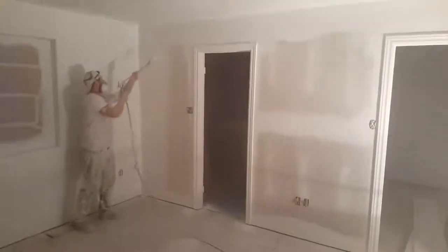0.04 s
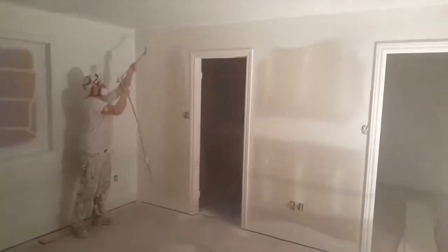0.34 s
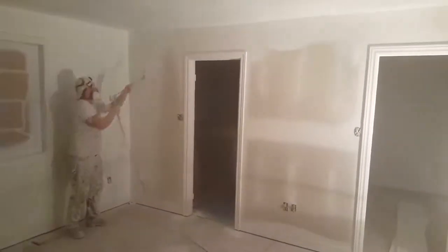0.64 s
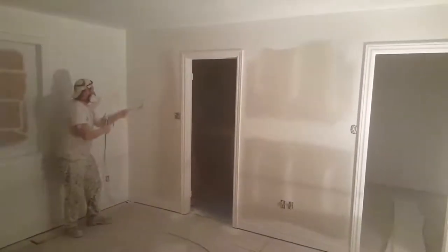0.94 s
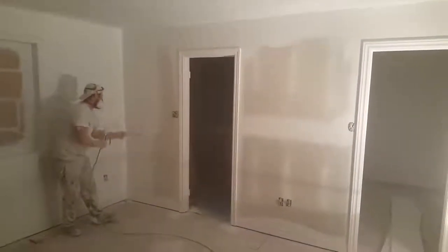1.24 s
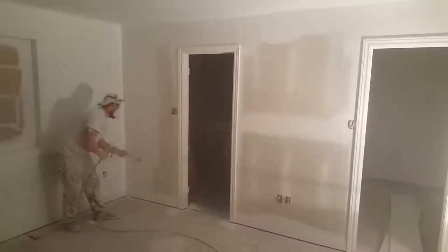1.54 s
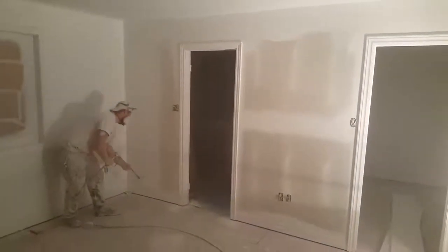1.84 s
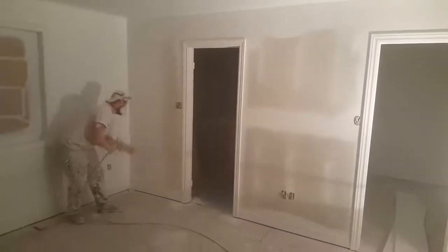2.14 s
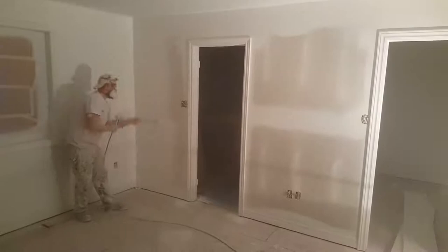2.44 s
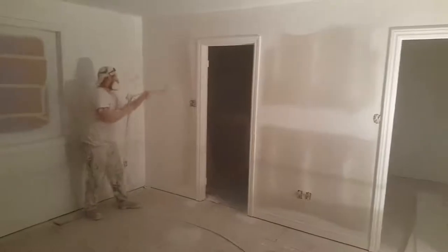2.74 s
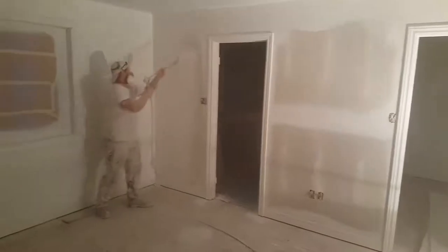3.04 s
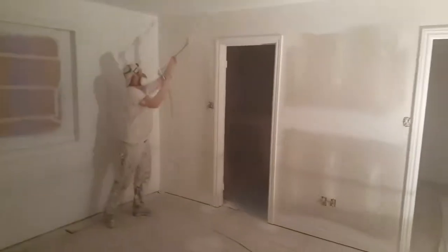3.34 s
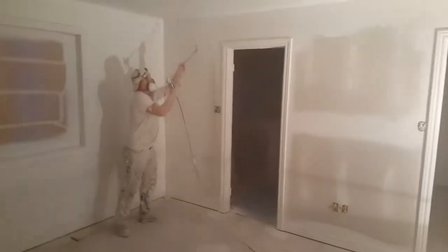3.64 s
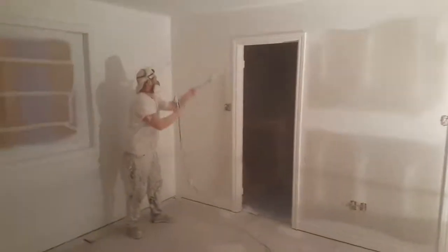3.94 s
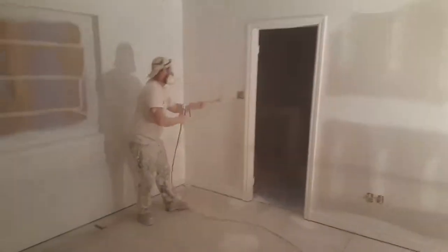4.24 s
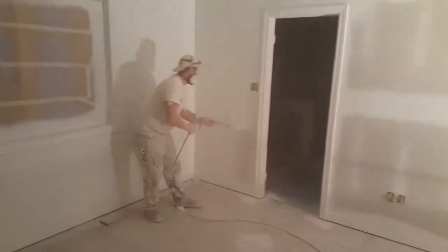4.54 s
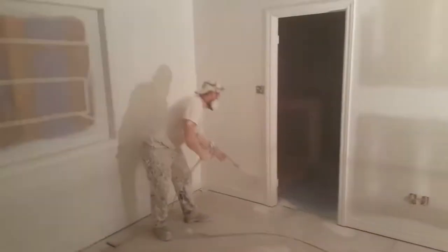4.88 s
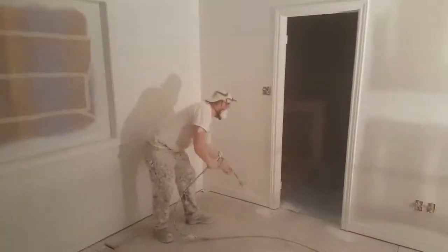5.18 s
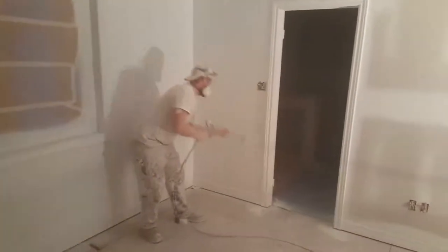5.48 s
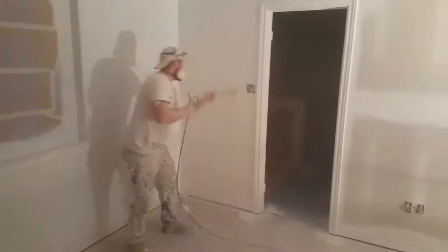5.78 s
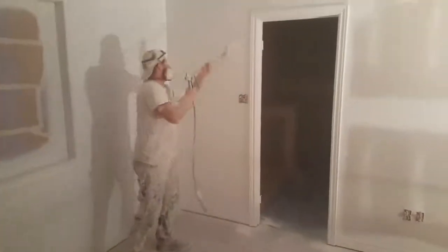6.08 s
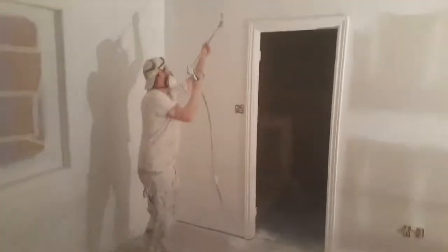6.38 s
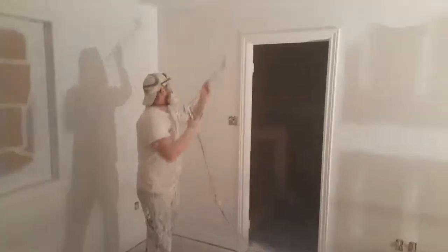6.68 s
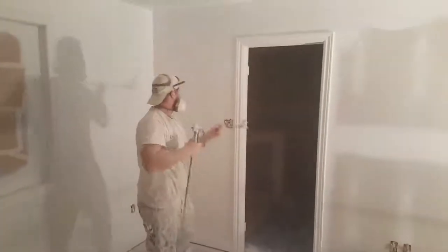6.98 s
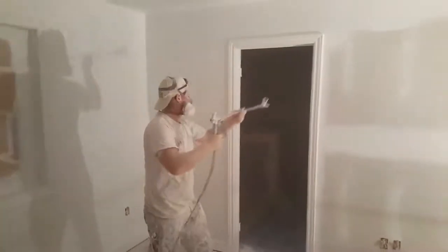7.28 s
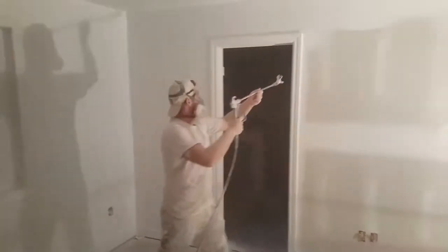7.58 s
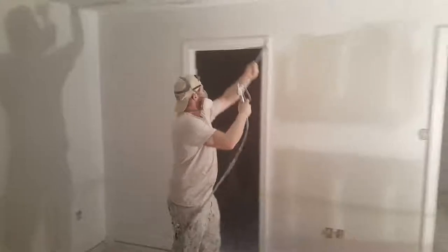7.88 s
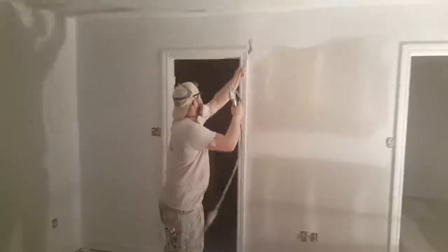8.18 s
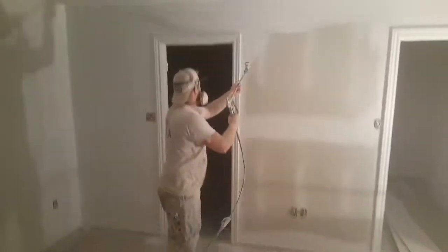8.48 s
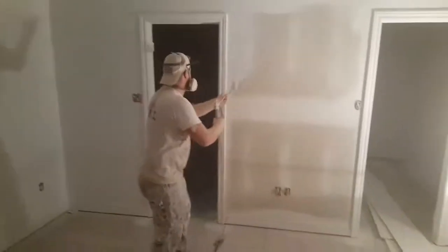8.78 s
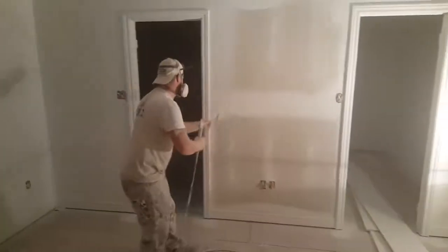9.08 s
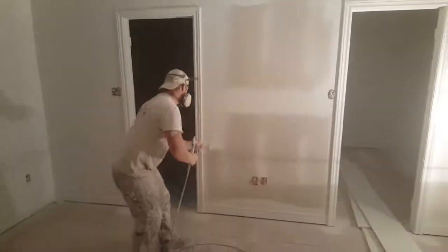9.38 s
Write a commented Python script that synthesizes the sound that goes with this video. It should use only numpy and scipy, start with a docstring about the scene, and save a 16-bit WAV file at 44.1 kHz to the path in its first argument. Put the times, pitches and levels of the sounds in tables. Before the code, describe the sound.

A paint sprayer hisses over a whirring pump in an echoing room, pauses for shuffling steps, then starts again.

```python
"""An airless paint sprayer hisses in a bare, echoing room as paint tears into droplets at its tip.
Farther off, the pump's motor hums, its housing rattles and its gears whirr with each piston stroke.
The trigger is let go for under two seconds; the pump swells briefly, stops,
and restarts after the spray resumes. Shoes shuffle, scrape and knock on the dusty, hollow floor nearby.
In the pause the gun ticks once and a hand bumps the microphone."""
import sys
import numpy as np
from scipy import signal
from scipy.fft import rfft, irfft, next_fast_len
from scipy.io import wavfile
from scipy.ndimage import map_coordinates

SR = 44100
rng = np.random.default_rng(int(sys.argv[2]) if len(sys.argv) > 2 else 0)


def generate_wav(sig):
    """Save sig (samples, or channels by samples) to the path in sys.argv[1] as 16-bit PCM at SR."""
    pcm = np.round(np.clip(np.atleast_2d(sig).T, -1, 1) * 32767).astype(np.int16)
    wavfile.write(sys.argv[1], SR, pcm)


N = 419832
TIME_S = np.arange(N) / SR


def amp(db):
    return 10 ** (np.asarray(db) / 20)


def unit_rms(x):
    return x / np.sqrt(np.mean(x ** 2) + 1e-20)


def at_hz(points, hz):
    """Interpolate (Hz, value) rows on a log axis."""
    knots_hz, values = np.transpose(points)
    return np.interp(np.log(hz + 1), np.log(knots_hz + 1), values)


def curve(rows):
    """Interpolate (s, value) rows per sample."""
    return np.interp(TIME_S, *np.transpose(rows))


def gate(spans, rise_s, fall_s):
    """1 within the (on, off) spans, with linear ramps."""
    return sum(np.clip((TIME_S - on) / rise_s, 0, 1) * np.clip((off - TIME_S) / fall_s + 1, 0, 1)
               for on, off in spans)


def bell(centre_s, sigma_s):
    return np.exp(-.5 * ((TIME_S - centre_s) / sigma_s) ** 2)


def swells(rows):
    return sum(amp(db) * bell(centre_s, sigma_s) for centre_s, db, sigma_s in rows)


def wobble(rate_hz):
    """Smooth random curve with rate_hz knots a second."""
    return map_coordinates(rng.standard_normal(int(N * rate_hz / SR) + 4), [TIME_S * rate_hz])


def filtered(x, response):
    size = next_fast_len(N + SR // 2)
    return irfft(rfft(x, size) * response(np.fft.rfftfreq(size, 1 / SR)), size)[..., :N]


def noise(spectrum):
    """Independent mid and side noise, rms 1."""
    return unit_rms(filtered(rng.standard_normal((2, N)), lambda hz: amp(at_hz(spectrum, hz))))


def ahead(x):
    """A source straight ahead: all mid, no side."""
    return np.array([x, np.zeros(N)])


def body_response(spectrum, size=4096):
    """Minimum-phase impulse response, peak 1."""
    cepstrum = irfft(np.log(amp(at_hz(spectrum, np.fft.rfftfreq(size, 1 / SR)))))
    cepstrum[1:size // 2] *= 2
    cepstrum[size // 2 + 1:] = 0
    response = irfft(np.exp(rfft(cepstrum)))
    return response / np.abs(response).max()


def strikes(rows, spectrum, t60_s=0, contact_s=.0026):
    """Blows (s, dB) on a body: dense ringing modes, or a dead impact if t60_s is 0."""
    blows = np.zeros(N)
    t = np.arange(SR // 4) / SR
    for start_s, db in rows:
        blow = t == 0
        if t60_s:
            blow = rng.standard_normal(len(t)) * (1 - np.exp(-t / contact_s)) * amp(-60 * t / t60_s)
        blows[round(start_s * SR):][:len(t)] += amp(db) * blow / np.linalg.norm(blow)
    return signal.fftconvolve(blows, body_response(spectrum))[:N]


def early_reflections(x, count=10):
    """Wall echoes carve fixed ripples into a still source's spectrum; rms 1."""
    lags_s = rng.uniform(.004005, .05, count)
    echoes = sum(rng.choice([-1, 1]) * np.roll(x, round(lag * SR), axis=1) for lag in lags_s)
    return unit_rms(x + .2 * echoes)


# Trigger held. Each row: open in seconds, shut in seconds.
TRIGGER_SPANS_S = [(-1, 6.452), (8.202, 11)]
SHUT_S, REOPEN_S = TRIGGER_SPANS_S[0][1], TRIGGER_SPANS_S[1][0]
# Jet and finer mist. Each row: frequency in Hz, density in dB.
JET_SPECTRUM = [(40, -44), (150, -24), (1000, -18), (2000, -16), (2700, -13.2), (3300, -12.3), (4200, -8),
                (5200, -5.5), (6400, -0.15), (7100, -2.5), (7900, 1.1), (8700, -3), (9600, -13),
                (12000, -30)]
MIST_SPECTRUM = [(6000, -33), (8500, -2), (9600, 0.5), (11000, 0.5), (12500, 0), (14000, -2.5),
                 (16000, -5.5)]
# Mist, weaker as the painter turns away. Each row: time in seconds, level in dB.
MIST_LEVEL_DB = [(0, -22.5), (5.4, -23.5), (8.3, -21), (9, -26.8), (9.5, -25)]


def spray(jet_db=-18.35, jet_db_per_s=.03, spurt_s=.047):
    """Paint tears into hissing droplets. Stored pressure spurts on opening and bleeds off on closing."""
    spurt_db = 2 * np.exp(-np.abs(TIME_S - REOPEN_S) / spurt_s)
    flutter_db = .5 * wobble(14) + 1.06 * wobble(70) + .55 * wobble(900)
    jet = amp(jet_db + jet_db_per_s * TIME_S + .2 * wobble(3)) * noise(JET_SPECTRUM)
    mist = amp(curve(MIST_LEVEL_DB) + .33 * wobble(11)) * noise(MIST_SPECTRUM)
    valve = gate(TRIGGER_SPANS_S, rise_s=.0033, fall_s=.12)
    return valve * amp(flutter_db + spurt_db) * (jet + mist)


def back_pressure():
    """0 while paint flows, rising to 1 behind the shut valve."""
    return gate([(SHUT_S, REOPEN_S)], rise_s=.21, fall_s=.05)


def pump_gain(db_per_s=-.03, pause_swell_db=4):
    """The pump slowly fades, and swells while the hiss pauses."""
    return amp(db_per_s * TIME_S + pause_swell_db * back_pressure())


# Motor running. Each row: on in seconds, off in seconds.
MOTOR_SPANS_S = [(-1, 6.94), (9, 11)]
# Loose housing and booming frame. Each row: frequency in Hz, density in dB.
HOUSING_SPECTRUM = [(50, -27), (150, -14), (250, -11.5), (340, -9), (520, -11.5), (600, -7.5), (820, -5.5),
                    (980, -9), (1200, -7.5), (1660, -4.7), (2100, -11), (3050, -13), (3450, -22),
                    (4600, -18.5), (4850, -14.5), (5250, -19), (6500, -23), (9000, -36), (12000, -47),
                    (16000, -52)]
FRAME_SPECTRUM = [(100, -25), (200, -3), (260, 0), (340, -1), (450, -12), (800, -40)]
# Hum, varying about the room. Each row: time in seconds, level in dB.
HUM_LEVEL_DB = [(0, -48.5), (.45, -47), (.68, -56), (1, -44.5), (1.7, -52), (2.2, -51), (2.45, -43),
                (2.75, -46.5), (3, -58), (3.45, -60), (3.9, -51), (4.38, -44.5), (5.1, -48), (5.9, -45.5),
                (6.15, -50), (6.4, -44.5), (9.5, -45)]


def pump_motor(motor_hz=83, hum_pause_db=7.5, boom_db_per_s=-1):
    """The motor shakes housing and frame. Returns rattle plus boom, and its own hum."""
    shaft_rad = 2 * np.pi * motor_hz * np.cumsum(1 + .0019 * wobble(5)) / SR  # load unsettles the speed
    rattle = amp(-30.5) * pump_gain() * early_reflections(noise(HOUSING_SPECTRUM))
    boom = amp(-39 + boom_db_per_s * TIME_S + 1.5 * wobble(6)) * noise(FRAME_SPECTRUM)
    hum_db = curve(HUM_LEVEL_DB) + hum_pause_db * back_pressure() + 1.9 * wobble(13)
    hum = amp(hum_db) * np.sin(shaft_rad + .6 * wobble(16))
    shaking = gate(MOTOR_SPANS_S, rise_s=.09, fall_s=.17) * (rattle + boom)
    return shaking, ahead(gate(MOTOR_SPANS_S, rise_s=.028, fall_s=.08) * hum)


# Gear whirr. Each row: frequency in Hz, density in dB.
WHIRR_SPECTRUM = [(150, -21.5), (250, -9.5), (340, -8), (520, -14), (600, -4), (660, -3.5), (740, 1.5),
                  (790, 2.5), (850, 1), (900, -5), (1000, -9.5), (1250, -12), (1500, -6), (1680, -5),
                  (1900, -10), (3000, -29), (6000, -60)]
# Gear tones. Each row: nominal pitch in Hz, level in dB, peak as a fraction of the stroke,
# swell sharpness, drift in dB/s as the listener roams, change in dB while the valve is shut.
GEAR_TONES = [(576.6, -48.5, 0.56, 0.31, -.5, 11), (614, -48, 0.41, 0.72, -.4, 11),
              (651.4, -34.3, 0.21, 0.38, -1.35, 0), (683, -42.5, .72, .8, .1, 2),
              (710, -36.8, 0.64, 2, -1.6, 1), (790, -39.5, 0.93, 1.1, -.45, 7),
              (842, -40, 0.16, 1.7, -1.3, 4), (1508, -44.5, .98, 3, -.9, -5),
              (1600, -49, 0.53, 0.56, -.7, 10), (1670, -41, 0.088, 1.4, -.8, -3)]


def gear_train(stroke_hz=7.684, sag_hz_per_s=.006, roam_rad_per_s=.22 * np.pi, size=8192):
    """The same teeth meet in every stroke: the whirr repeats and each tone swells at its own point."""
    pressure = back_pressure()
    strokes = np.cumsum(stroke_hz - sag_hz_per_s * TIME_S + .00601 * wobble(2)) / SR
    orders = np.arange(size // 2 + 1)
    phasors = np.exp(2j * np.pi * rng.random((4, len(orders))))
    cycles = irfft(amp(at_hz(WHIRR_SPECTRUM, orders * stroke_hz)) * phasors)
    looped = np.array([np.interp(strokes, np.arange(size) / size, cycle, period=1) for cycle in cycles])
    here, there = unit_rms(looped).reshape(2, 2, N)  # whirr at two listening spots
    roam_rad = roam_rad_per_s * TIME_S + .25 * wobble(1.5)
    whirr = amp(-31.6) * (np.cos(roam_rad) * here + np.sin(roam_rad) * there)
    for hz, db, peak_at, sharpness, db_per_s, pause_db in GEAR_TONES:
        swell = unit_rms(np.exp(sharpness * np.cos(2 * np.pi * (strokes - peak_at))))
        mesh_rad = 2 * np.pi * (round(hz / stroke_hz) * strokes + rng.random((2, 1)))
        tone = unit_rms(np.sin(mesh_rad + .25 * wobble(12) + .18 * wobble(60)))
        tone_db = db + db_per_s * TIME_S + pause_db * pressure + 1.3 * wobble(9)
        whirr += amp(tone_db) * swell * tone
    return gate(MOTOR_SPANS_S, rise_s=.17, fall_s=.28) * pump_gain() * whirr


# Room air. Each row: frequency in Hz, density in dB.
AIR_SPECTRUM = [(25, -19), (55, 0), (80, 9), (250, -5), (1000, -12), (4000, -22), (9000, -35), (16000, -50)]


def room_air():
    """Faint, steady low noise of the room."""
    return amp(-54.7) * noise(AIR_SPECTRUM)


def slide(start_s, hold_s, attack_s=.1, fade_db_per_s=58):
    """Envelope of a sole that gathers speed, holds it and slows to rest."""
    since_s = TIME_S - start_s
    slowing_s = np.maximum(since_s - attack_s - hold_s, 0)
    return .5 * (1 + np.tanh(2 * since_s / attack_s - 1)) * amp(-fade_db_per_s * slowing_s)


# Hollow floor, joists, rubber sole and dust. Each row: frequency in Hz, density in dB.
BOARD_SPECTRUM = [(40, -37), (110, -27), (165, -7.5), (260, -.5), (345, 1.5), (500, -8), (700, -7.5),
                  (1000, -18), (1400, -22), (2500, -35), (5000, -58)]
JOIST_SPECTRUM = [(50, -26), (100, -10), (145, 0), (180, -2), (300, -20), (1000, -60)]
SCRAPE_SPECTRUM = [(250, -20), (550, 2.5), (750, 6.5), (1100, -3), (1350, -1), (2000, -6), (2600, -7.3),
                   (3500, -17), (8000, -45)]
GRIT_SPECTRUM = [(1200, -15), (2600, 2), (3400, 1.5), (6000, -0.5), (8300, -2), (9400, -13), (12000, -16),
                 (16000, -18)]
# Weight on the boards, soft steps on the joists and a sole's squeak.
# Each row: centre in seconds, level in dB, sigma in seconds.
BOARD_TREADS = [(.2, -36.5, 0.07), (.57, -38, .05), (2.62, -35.5, 0.046), (4.42, -36.5, 0.046),
                (5.92, -35, 0.056), (6.84, -33.5, 0.055), (7.175, -26.5, .06), (7.41, -31, 0.13),
                (7.8, -42.5, 0.1), (8.09, -34.5, 0.041), (8.33, -33.5, 0.08), (9.0, -37, 0.037),
                (9.2, -32.5, 0.085)]
JOIST_STEPS = [(4.41, -41, .05), (5.92, -39.5, .03), (6.83, -39, .04), (8.15, -42, .04), (9.15, -38, .04)]
SOLE_SQUEAKS = [(7.922, -34, 0.012)]
# Sliding soles. Each row: start in seconds, hold in seconds, scrape in dB, grit in dB.
SOLE_SLIDES = [(7.128, 0.06, -24.3, -37.5), (7.849, 0.11, -36, -40)]


def shuffle(squeak_hz=890):
    """Soles catch and slip: boards judder, joists flex, rubber scrapes and squeaks, dust rasps."""
    judder = swells(BOARD_TREADS) * unit_rms(noise(BOARD_SPECTRUM) * amp(2 * wobble(70)))
    scrape = unit_rms(noise(SCRAPE_SPECTRUM) * amp(wobble(120)))
    grit = unit_rms(noise(GRIT_SPECTRUM) * amp(.9 * wobble(300)))
    sliding = sum(slide(start_s, hold_s) * (amp(scrape_db) * scrape + amp(grit_db) * grit)
                  for start_s, hold_s, scrape_db, grit_db in SOLE_SLIDES)
    flex = swells(JOIST_STEPS) * noise(JOIST_SPECTRUM)
    squeak = unit_rms(np.sin(2 * np.pi * squeak_hz * TIME_S + .4 * wobble(90)))
    return judder + flex + sliding + swells(SOLE_SQUEAKS) * ahead(squeak)


# Heels and loose boards. Each row: start in seconds, thud in dB, clack in dB.
HEEL_KNOCKS = [(6.81, -15, -22), (7.098, -24, -40), (7.161, -19, -32), (7.185, -18, -27),
               (7.201, -14.5, -22), (7.242, -16.5, -21), (7.323, -18, -24), (7.424, -15.5, -26),
               (7.497, -25, -36), (7.548, -27, -21), (8.075, -22, -21), (8.29, -24, -36), (9.096, -11.5, 1),
               (9.12, -14.5, -8), (9.143, -13.5, -6), (9.169, -14.5, -11)]
# Ringing board. Each row: frequency in Hz, density in dB.
CLACK_SPECTRUM = [(300, -22.5), (850, 1.5), (1150, -2), (1400, 2.5), (1900, -0.5), (2800, -4.5),
                  (4000, -22), (9000, -45)]


def heel_knocks():
    """Heels strike the hollow floor. Returns the dead thud and the ringing clack."""
    thud = strikes([(start_s, db) for start_s, db, _ in HEEL_KNOCKS], BOARD_SPECTRUM)
    clack = strikes([(start_s, db) for start_s, _, db in HEEL_KNOCKS], CLACK_SPECTRUM, t60_s=.065)
    return ahead(thud), ahead(clack)


# Hand contacts. Each row: centre in seconds, level in dB, sigma in seconds.
HAND_BUMPS = [(7.66, -35, 0.03), (7.8, -47, 0.065)]
# Handling noise. Each row: frequency in Hz, density in dB.
BUMP_SPECTRUM = [(20, -3), (35, -2), (90, -2), (150, 0), (300, -23), (1000, -60)]


def hand_bumps():
    """A hand bumps the microphone's housing: dull, low thumps."""
    return swells(HAND_BUMPS) * noise(BUMP_SPECTRUM)


# Tick of the gun. Each row: start in seconds, level in dB.
GUN_TICKS = [(7.734, -19)]
# Gun body. Each row: frequency in Hz, density in dB.
GUN_SPECTRUM = [(1000, -20), (1650, -5), (1800, 0), (2050, -2), (2400, 4), (2800, 1), (4000, -5),
                (6500, -3), (9000, -14), (15000, -29)]


def gun_tick():
    """The spray gun ticks lightly and rings."""
    return ahead(strikes(GUN_TICKS, GUN_SPECTRUM, t60_s=.08))


# Bare walls. Each row: frequency in Hz, t60 in seconds.
WALL_T60_S = [(150, 0.45), (700, 0.9), (3000, 0.48), (7000, 0.7), (14000, 0.35)]


def wall_reverb(x, size=768):
    """Diffuse tail, mid and side: each band stores the energy fed to it and lets it die away."""
    hz, frame_s, bands = signal.stft(x, SR, nperseg=size)
    lag_s = frame_s[frame_s < 1]
    decay = amp(-60 * lag_s / at_hz(WALL_T60_S, hz)[:, None]) ** 2 * (lag_s > 0)
    decay /= decay.sum(1, keepdims=True)
    energy = signal.fftconvolve(np.abs(bands) ** 2, decay, axes=1)[:, :len(frame_s)]
    scatter = signal.stft(rng.standard_normal((2, N)), SR, nperseg=size)[2]
    tail = scatter / scatter.std() * np.sqrt(np.abs(energy))
    return signal.istft(tail, SR, nperseg=size)[1][:, :N]


# Low room modes. Each row: frequency in Hz, gain in dB, t60 in seconds.
ROOM_MODES = [(215, 2.5, .3), (266, 0, .22)]


def standing_waves(hz):
    """Response of the room's modes: they lift their own pitches and ring on after a blow."""
    response = 1
    for mode_hz, db, t60_s in ROOM_MODES:
        width_hz = np.log(1000) / np.pi / t60_s
        damping = 1j * hz * width_hz
        response += amp(db) * damping / (mode_hz ** 2 - hz ** 2 + damping)
    return response


# Likeness of the microphone's two ports. Each row: frequency in Hz, left-right correlation.
PORT_CORRELATION = [(60, 0.5), (290, 0.88), (640, 0.4), (1300, -0.32), (2600, 0.13), (6000, 0)]


def mid_side_gains(hz):
    """The ports hear the bass alike and the treble unrelated."""
    angle_rad = np.arccos(np.clip(at_hz(PORT_CORRELATION, hz), -1, 1)) / 2
    return np.array([np.cos(angle_rad), np.sin(angle_rad)])


def scene():
    """Direct sound plus the room's echo, as left and right."""
    shaking, hum = pump_motor()
    thud, clack = heel_knocks()
    tick = gun_tick()
    # Each row: sound, reverb send in dB.
    sources = [(spray(), -1), (shaking, -4), (gear_train(), -11),
               (shuffle(), -7), (thud, 0), (clack + tick, .5)]
    direct = sum(sound for sound, _ in sources)
    reverb = wall_reverb(sum(amp(send_db) * sound[0] for sound, send_db in sources))
    field = filtered(direct + reverb, standing_waves) + hum + room_air() + hand_bumps()
    dip_db = -2 * bell(centre_s=5.29, sigma_s=.16)  # the whole sound dips briefly
    mid, side = filtered(amp(dip_db) * field, mid_side_gains)
    return np.array([mid + side, mid - side])


# Colour of the ports. Each row: frequency in Hz, left minus right in dB.
PORT_BALANCE_DB = [(60, 1), (350, 0.2), (700, 0.5), (1290, 3), (2380, 1), (4400, -2.5), (6300, -3.5),
                   (8300, 0.5), (11000, -0.5), (14000, -8)]


def record(dry, low_cut_hz=35, ceiling=.92, top_hz=15900):
    """Port colour, bass roll-off, soft clipping and band limit."""
    def ports(hz):
        balance = amp(np.outer([.5, -.5], at_hz(PORT_BALANCE_DB, hz)))
        return balance * hz / np.hypot(hz, low_cut_hz)

    coloured = filtered(dry, ports)
    rounded = coloured / (1 + (coloured / ceiling) ** 10) ** (1 / 10)
    return filtered(rounded, lambda hz: hz < top_hz)


dry = scene()
out = record(dry)
generate_wav(out)
```